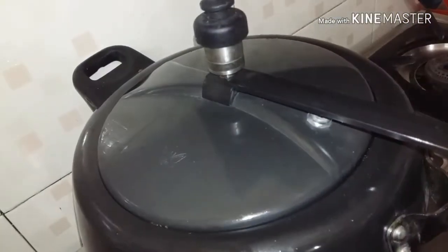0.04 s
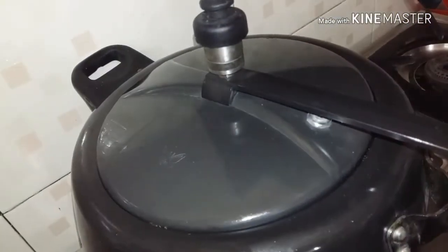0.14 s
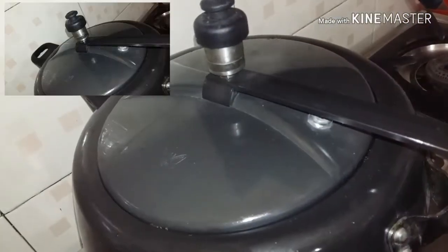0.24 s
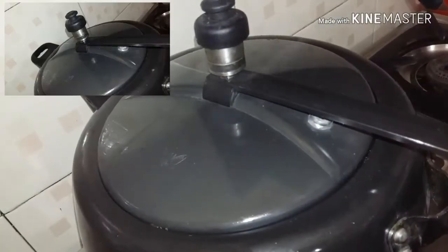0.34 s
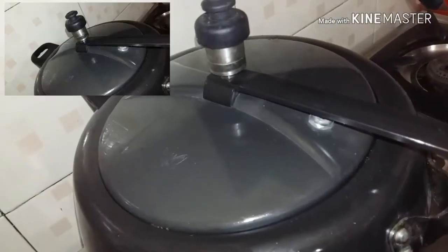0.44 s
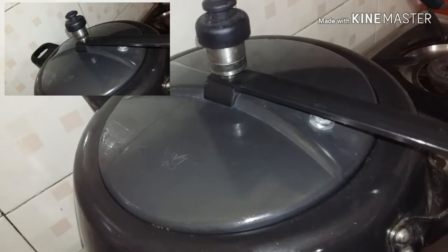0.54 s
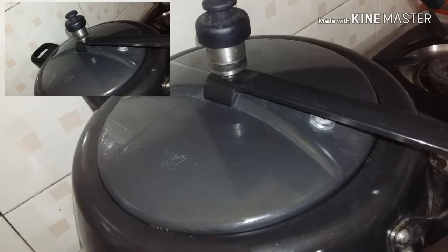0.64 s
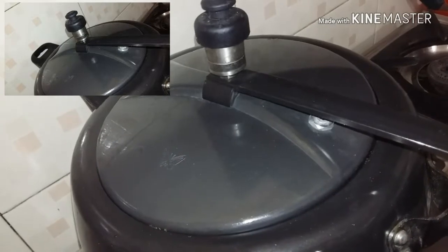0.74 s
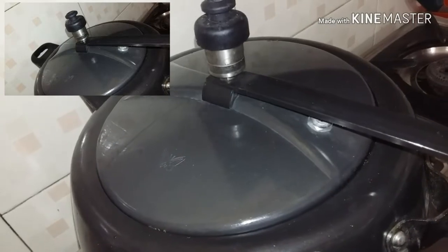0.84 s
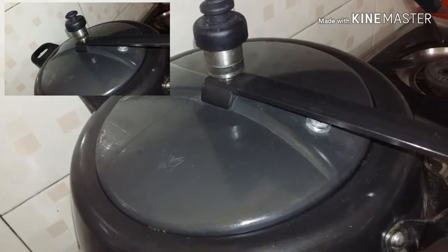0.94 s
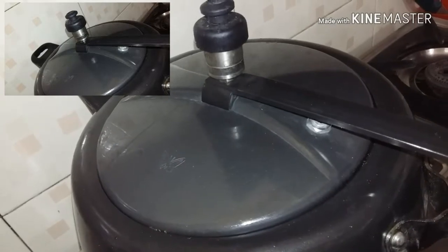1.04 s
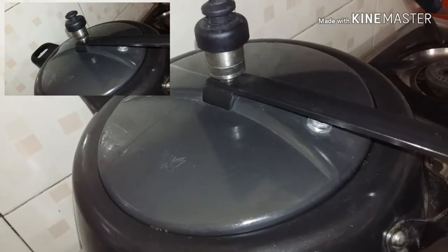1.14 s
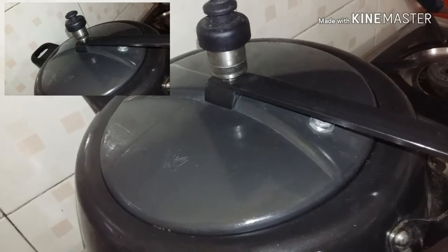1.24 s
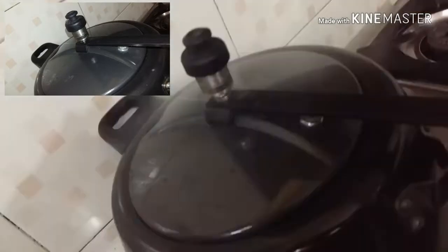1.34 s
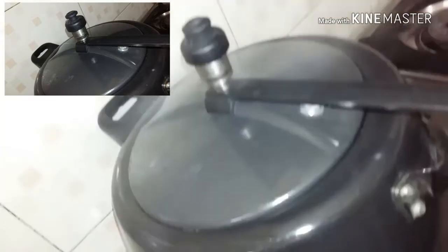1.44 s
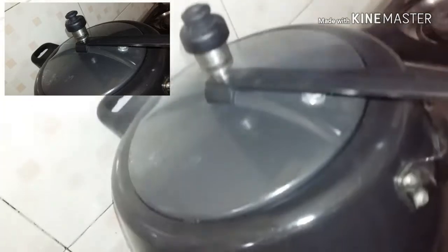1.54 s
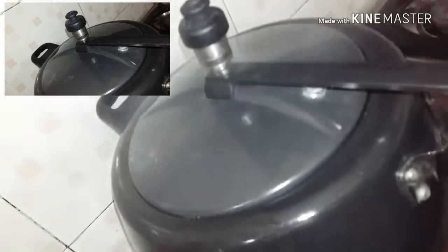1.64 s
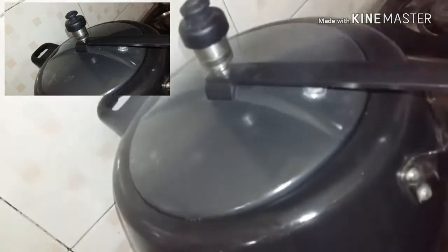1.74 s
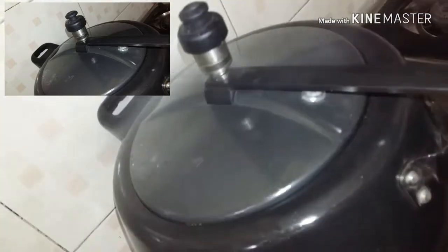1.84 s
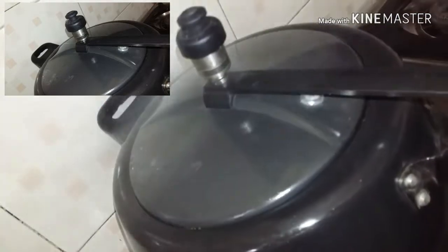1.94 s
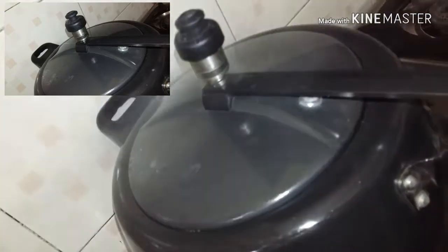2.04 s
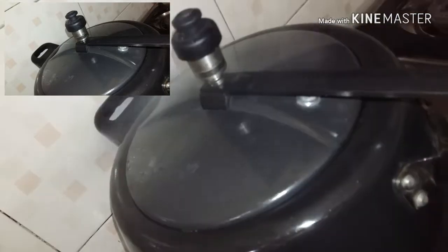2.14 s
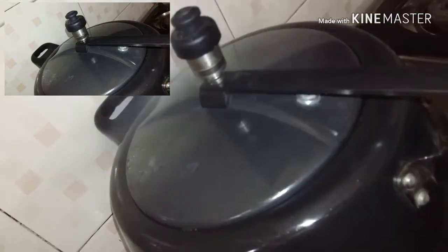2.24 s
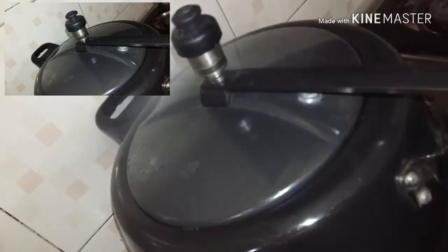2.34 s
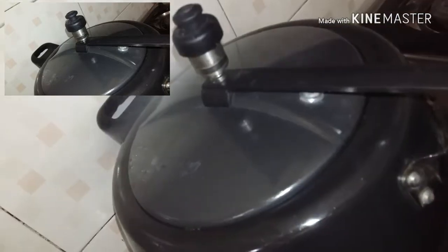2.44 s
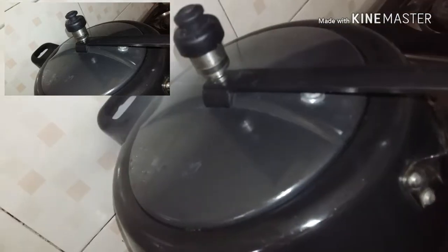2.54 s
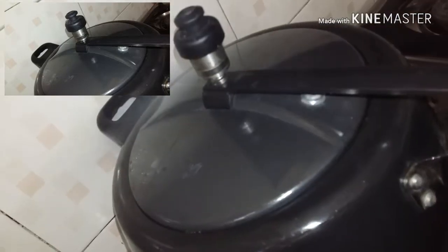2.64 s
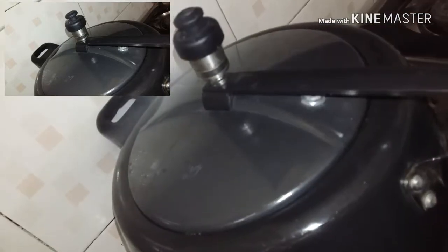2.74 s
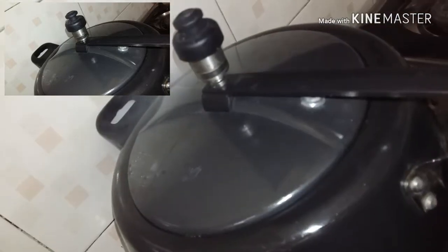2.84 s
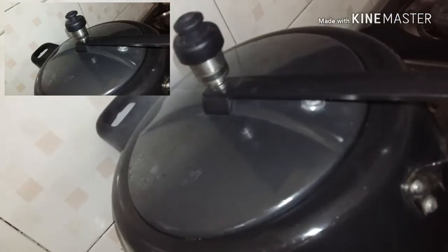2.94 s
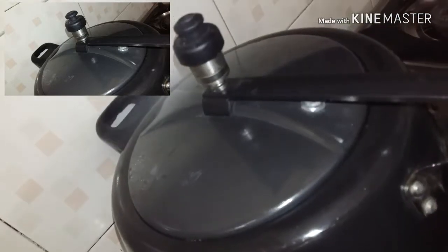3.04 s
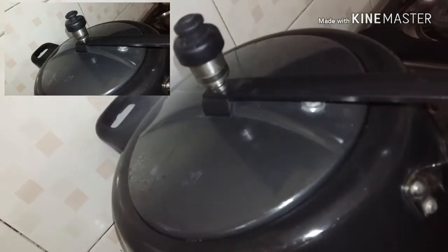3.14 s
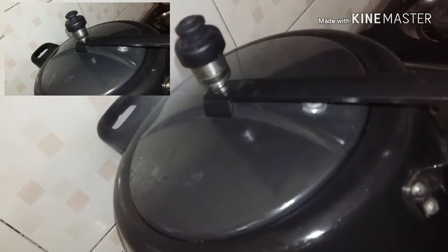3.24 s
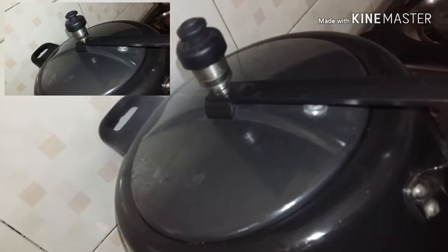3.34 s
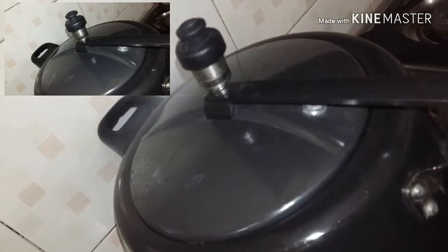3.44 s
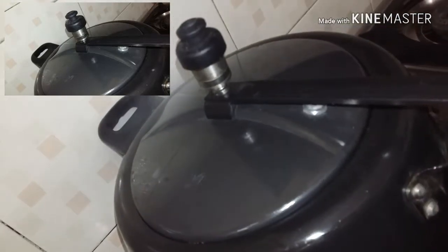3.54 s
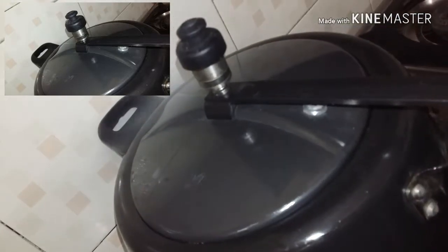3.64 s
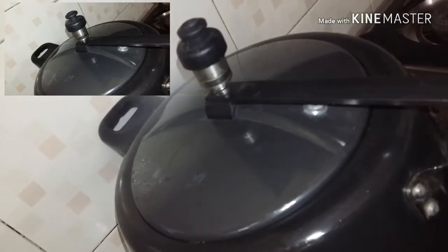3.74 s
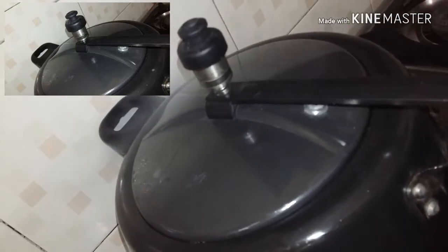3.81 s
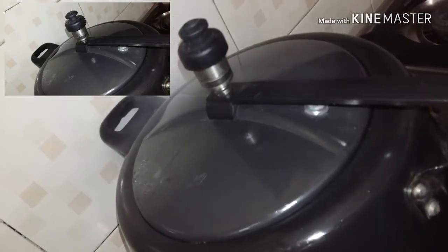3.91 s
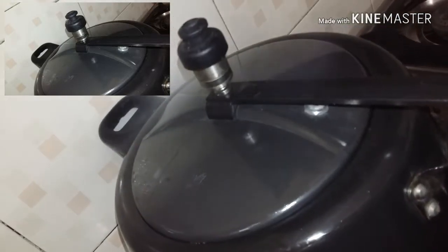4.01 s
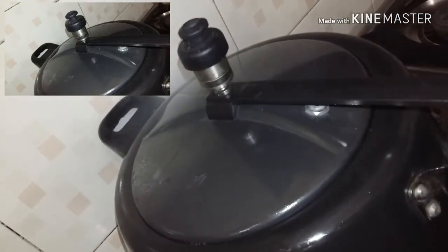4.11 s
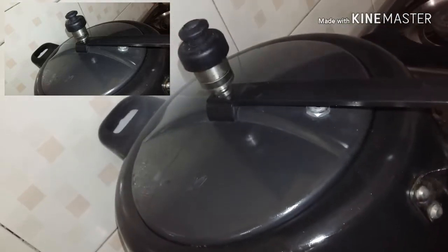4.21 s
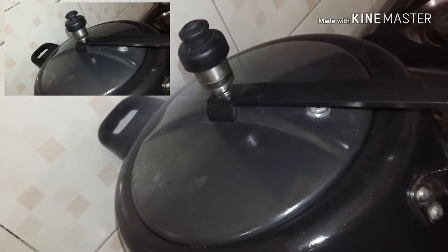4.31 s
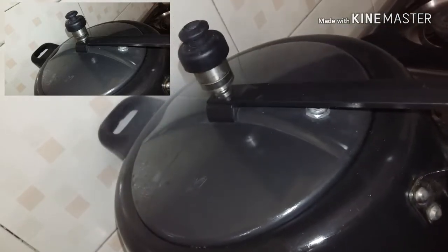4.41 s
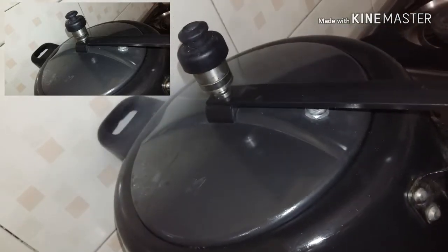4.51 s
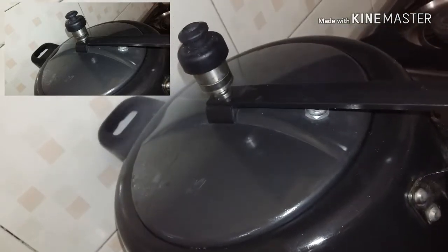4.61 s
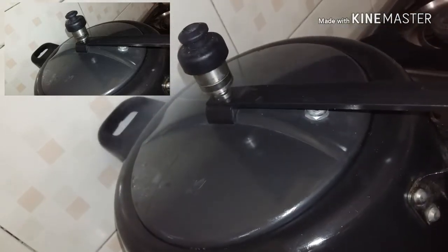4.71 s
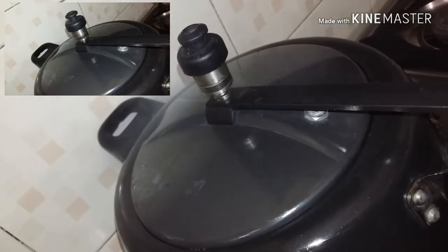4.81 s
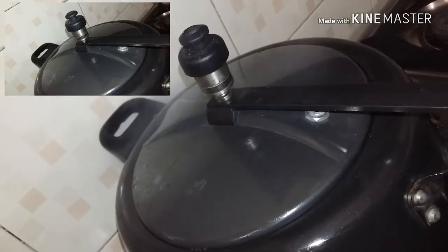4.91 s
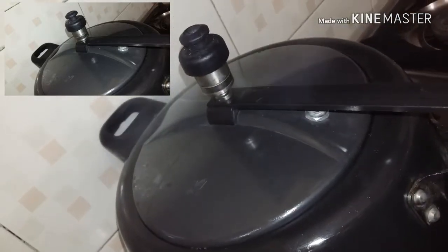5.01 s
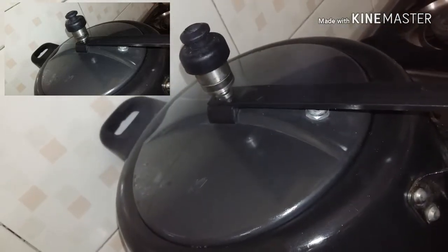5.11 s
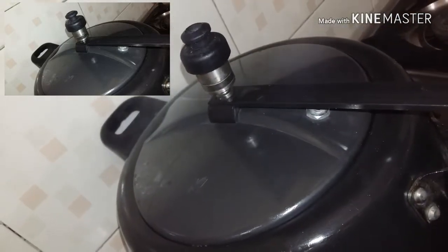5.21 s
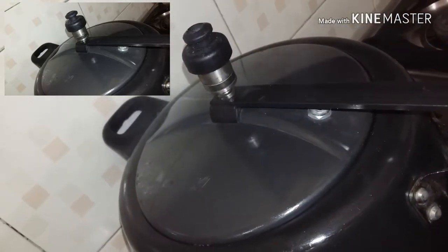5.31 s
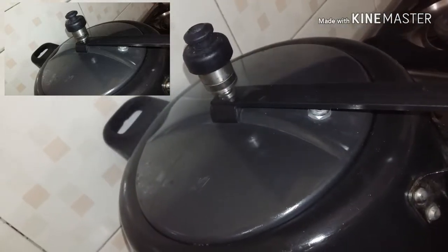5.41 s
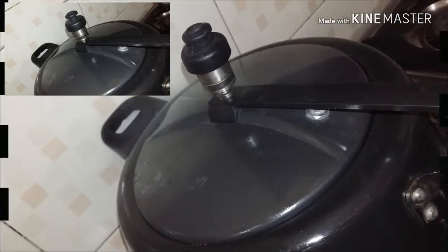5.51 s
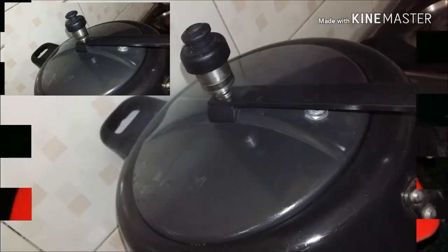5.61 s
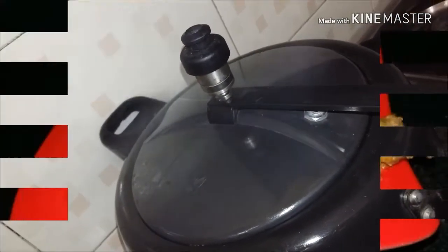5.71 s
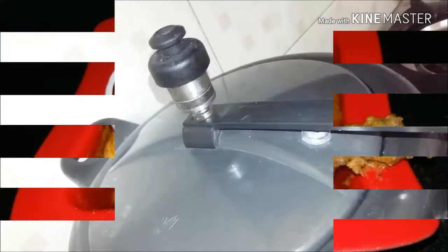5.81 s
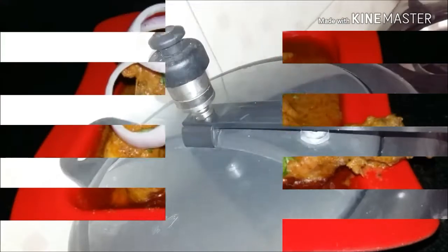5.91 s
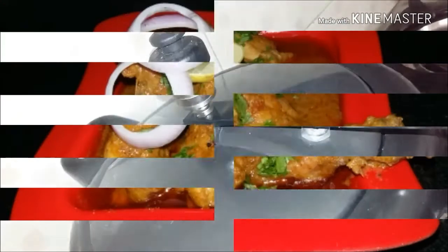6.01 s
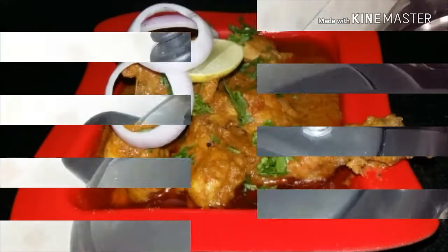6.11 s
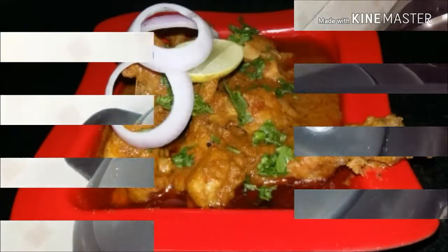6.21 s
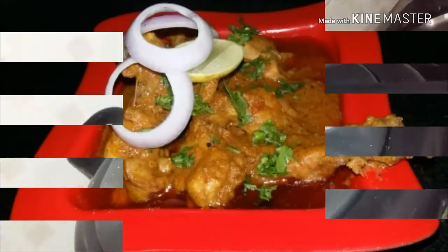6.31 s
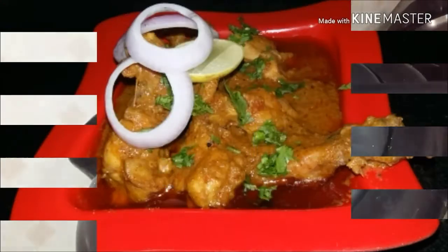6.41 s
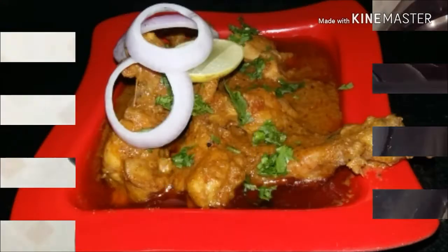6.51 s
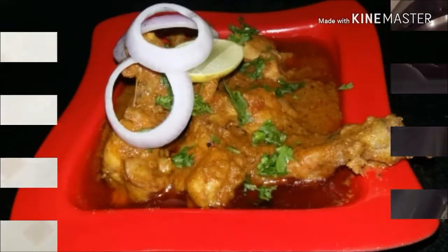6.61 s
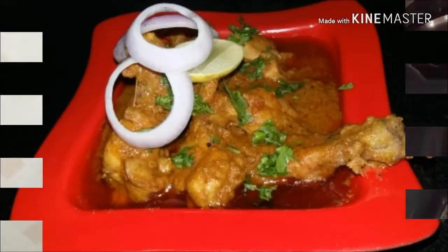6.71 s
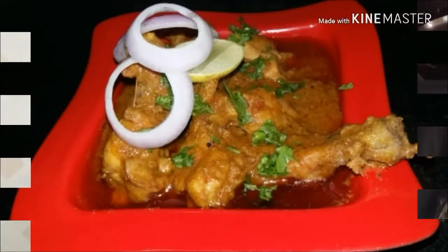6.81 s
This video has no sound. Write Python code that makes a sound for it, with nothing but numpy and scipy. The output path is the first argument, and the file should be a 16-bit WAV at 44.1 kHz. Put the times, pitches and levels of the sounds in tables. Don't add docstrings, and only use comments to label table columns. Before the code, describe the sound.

Close stereo pickup of a stovetop pressure cooker: first a quiet hiss over muffled thumps and a sharp tick, then a sudden switch to roaring, sputtering high-pitched steam. The blast holds steady, changes tone, and quickly loses force. A metal weight drops with a clack and brief rattle, choking the steam; the hard kitchen rings out and only a faint hiss remains.

```python
import sys
import numpy as np
from scipy import signal
from scipy.io import wavfile
from scipy.ndimage import uniform_filter1d

SR = 44100
rng = np.random.default_rng(int(sys.argv[2]) if len(sys.argv) > 2 else 0)


def nominal_scale(level):
    x = np.asarray(level, float) / 20
    return 10 ** x


def output_pcm(signal):
    pcm = np.clip(np.atleast_2d(signal).T, -1, 1) * 32767
    wavfile.write(sys.argv[1], SR, np.round(pcm).astype(np.int16))


N = 302526

JET_START_S, SAG_START_S = 1.4435, 5.8636

# pitch in Hz, level in dB per Hz.
SIMMER_COLOUR = [
    [(30, -91.5), (55, -87), (90, -56.5), (150, -65), (300, -73.5), (700, -74), (1500, -74.5), (2500, -69.5), (5000, -80), (9000, -77.5), (11000, -87), (15000, -87)],
    [(30, -92.6), (55, -86.0), (90, -61), (150, -75.5), (300, -79), (700, -77.5), (1500, -77), (2500, -72), (5000, -79.1), (9000, -84), (11000, -87), (15000, -91.0)],
]
# centre in Hz, width in Hz, level in dB.
SIMMER_PEAKS = [
    [(1110, 310, -2.1), (1350, 130, 3.3), (2490, 80, -2.9), (3050, 140, -5.0), (3190, 120, 3.5), (4710, 350, 2.9), (5000, 350, -4.2), (5530, 60, -2.9), (6000, 270, -4.7), (6020, 90, 7.2), (6920, 140, 5.9), (7050, 1200, -6.2), (7520, 60, 2.6), (8660, 200, 4.5), (8860, 320, -4.2), (9660, 760, 3.8), (10040, 100, -3.1), (10430, 110, 3.4), (10700, 60, -2.7), (10970, 120, 2.3)],
    [(1420, 80, 2.4), (1780, 60, 3.8), (1990, 100, -3.3), (2170, 110, 3.9), (2340, 360, -4.7), (2860, 980, 2.0), (3280, 60, -2.8), (3650, 570, -4.6), (4190, 580, 6.4), (4690, 200, 6.3), (5210, 330, -3.0), (6060, 60, 2.6), (6390, 90, 2.5), (7130, 850, -3.7), (7970, 290, -2.7), (8440, 70, -1.9), (8940, 140, -4.1), (9650, 140, 1.9), (10140, 650, 4.1), (10440, 160, 4.0)],
]
# pitch in Hz, level in dB per Hz.
JET_COLOUR = [
    [(30, -99.0), (55, -98), (90, -90.5), (150, -86), (300, -87), (700, -74), (1500, -63.5), (2500, -55.5), (5000, -59.5), (9000, -57), (11000, -64.5), (15000, -71)],
    [(30, -99.0), (55, -100), (90, -92), (150, -86), (300, -87.5), (700, -75.0), (1500, -64), (2500, -61.5), (5000, -55), (9000, -60.5), (11000, -60.0), (15000, -71)],
]
# centre in Hz, width in Hz, level in dB.
JET_PEAKS = [
    [(480, 40, 3.5), (1320, 180, 1.9), (1550, 40, -2.7), (1700, 160, 2.7), (1920, 150, 3.1), (2120, 200, 5.5), (2540, 180, 3.1), (2920, 60, -2.1), (3310, 250, 6.4), (3450, 180, -4.3), (3730, 140, 3.3), (4210, 80, -2.2), (4370, 150, 3.5), (4650, 70, -1.8), (5150, 340, 4.3), (5190, 100, -6.7), (5450, 110, 3.4), (5680, 50, 3.7), (5960, 100, 7.6), (6190, 100, 5.0), (6580, 150, 5.2), (6910, 300, 4.0), (7100, 100, 3.1), (8180, 790, 7.2), (8990, 80, 1.7), (10290, 90, -1.6), (10520, 80, -3.1), (10750, 120, -2.4)],
    [(910, 260, -2.8), (1300, 230, -4.4), (1630, 110, 2.7), (1750, 60, -1.9), (1940, 1160, 4.1), (2440, 140, -2.7), (2530, 180, 3.4), (2980, 80, 2.0), (3090, 1200, -3.8), (3330, 40, 2.5), (4100, 100, 1.8), (4450, 460, 9.6), (4780, 110, -4.1), (5200, 130, -4.1), (5430, 1200, 3.0), (5600, 120, -5.3), (5770, 140, -4.5), (6200, 400, -2.4), (6590, 210, 4.4), (7020, 40, -2.8), (7240, 750, -3.5), (7590, 210, 4.0), (7900, 130, 1.7), (8280, 60, -1.4), (9010, 300, 3.2), (9410, 70, 2.7), (9900, 1200, -2.6), (10410, 100, 2.2)],
]
# pitch in Hz, level in dB per Hz.
SAG_COLOUR = [
    [(30, -97.8), (55, -94.4), (90, -97), (150, -94), (300, -85.5), (700, -76), (1500, -66.5), (2500, -56.8), (5000, -62), (9000, -67.0), (11000, -68.5), (15000, -77.0)],
    [(30, -97.8), (55, -94.4), (90, -96.0), (150, -95.0), (300, -89), (700, -78.5), (1500, -69.5), (2500, -65), (5000, -55), (9000, -64), (11000, -69.5), (15000, -79)],
]
# centre in Hz, width in Hz, level in dB.
SAG_PEAKS = [
    [(1360, 240, 3.0), (1880, 230, 4.1), (2470, 350, 4.4), (2710, 1120, -4.2), (3460, 110, 3.2), (3760, 190, 2.2), (4230, 290, -4.0), (4740, 170, 3.0), (5580, 120, 3.1), (6000, 80, -2.2), (6150, 690, 10.0), (7100, 770, 9.5), (7170, 120, -5.9), (7550, 150, 3.1), (8110, 490, 3.9), (9460, 270, -2.0), (9650, 80, -3.3), (10810, 120, 2.9)],
    [(1310, 650, -3.5), (1690, 800, 5.9), (2110, 180, -3.5), (2740, 180, -6.2), (3630, 940, -5.8), (3880, 100, 4.6), (4160, 110, -7.3), (4370, 940, 9.3), (5010, 290, -7.4), (5740, 310, -5.9), (6260, 90, -3.2), (6860, 650, 2.6), (7300, 570, -5.5), (7610, 130, 3.8), (8430, 390, -5.3), (9550, 400, -4.7), (10460, 80, 1.7), (10790, 100, 3.2)],
]
# pitch in Hz, level in dB per Hz.
LEAK_COLOUR = [(18, -54), (30, -24), (185, -13.5), (662, -9), (774, -5), (905, -8), (3590, -12),
               (4420, -8.5), (9640, -18.5), (12200, -25), (15000, -24)]
# centre in Hz, width in Hz, level in dB.
LEAK_PEAKS = [(772, 40, 5), (190, 36, 9), (1060, 55, 6), (1270, 55, 7), (1820, 50, 6), (3700, 300, -2),
              (4410, 320, 1), (5000, 300, -8), (13000, 5000, -1)]
# pitch in Hz, share in step (0 to 1, minus is flipped), share a quarter turn ahead.
SIMMER_PORTS = [(60, 0.99, 0), (260, 1.01, -0.01), (780, 0.92, 0.1), (1550, 0.37, -0.13),
                (1810, -0.26, -0.3), (2240, 0.63, -0.36), (2500, 0.8, 0.18), (2930, 0.7, 0.19),
                (3190, 0.5, -0.6), (4130, 0.26, 0.68), (4310, 0.59, 0.38), (4820, 0.42, 0.6),
                (5080, 0.04, -0.08), (5250, -0.02, 0.39), (5430, -0.44, 0.14), (5940, 0.21, 0.25),
                (6200, -0.2, 0.02), (6800, 0.47, -0.1), (7580, -0.18, 0.44), (8870, -0.42, 0.43),
                (9560, -0.59, -0.22), (10770, -0.43, -0.05), (10940, 0.54, 0.05), (11020, -0.15, 0.07),
                (11540, 0.25, 0.15)]
JET_PORTS = [(60, 0.99, 0), (260, 1.03, 0.01), (1120, 0.8, -0.15), (1460, 0.48, 0.04), (1640, -0.19, -0.45),
             (2240, 0.49, -0.2), (2330, 0.3, -0.24), (2500, 0.53, 0.13), (2840, -0.18, -0.02),
             (3190, 0.19, 0.31), (3360, -0.42, 0.43), (3530, 0.01, 0.41), (3880, -0.4, 0.27),
             (4130, -0.01, -0.07), (4310, -0.63, 0.27), (4390, -0.64, 0.15), (4820, 0.32, 0.18),
             (5080, 0.33, -0.33), (5510, 0.59, 0.21), (5860, 0.29, 0.02), (6030, 0.56, 0.28),
             (6200, 0.4, -0.47), (6460, 0.31, -0.35), (6630, 0.81, 0.17), (6890, 0.64, 0.2),
             (7060, -0.18, -0.13), (7580, -0.28, -0.04), (7920, -0.57, 0.33), (8180, -0.63, 0.15),
             (8440, -0.24, -0.06), (9300, -0.5, -0.42), (9470, -0.62, -0.18), (9820, -0.13, 0.02),
             (10420, 0.07, -0.39), (10770, -0.15, -0.03), (11460, 0.49, 0.07), (11540, 0.34, 0.06)]
SAG_PORTS = [(60, 0.99, 0), (260, 1.03, -0.03), (1460, 0.58, -0.23), (1810, -0.14, -0.64), (2500, 0.6, 0.2),
             (2840, -0.06, -0.12), (3010, 0.44, 0.48), (3450, 0.19, 0.61), (3620, -0.59, 0.37),
             (4130, -0.3, 0.16), (4740, 0.78, 0.32), (5340, -0.16, 0.05), (5510, 0.46, 0.26),
             (5770, -0.1, 0.26), (5860, 0.4, 0.08), (6460, 0.7, -0.29), (6890, 0.78, 0.17),
             (7320, -0.36, -0.08), (7580, 0.08, -0.43), (8100, 0.06, 0.52), (8790, -0.4, 0.1),
             (9820, 0.23, 0.32), (10510, -0.18, -0.34), (11370, -0.02, -0.12), (11540, 0.48, -0.13)]
# time in seconds, peak in dB, pitch in Hz.
THUMPS = [(0.009, -27, 88), (0.109, -28, 90), (0.149, -31, 96.9), (0.291, -31, 96), (0.389, -35, 99.6),
          (0.463, -35, 102), (0.659, -33, 108), (0.787, -28, 110), (0.843, -35, 86.1), (0.9, -33, 93),
          (0.986, -25.5, 97), (1.058, -33, 92), (1.152, -30, 109), (1.239, -31, 95), (1.31, -24.5, 94)]
# start in seconds, peak in dB.
TICKS = [
    (0.0855, -14),
    (0.4808, -33),
    (0.8535, -33),
]
# pitch in Hz, level in dB, seconds to fade by 60 dB.
TICK_MODES = [(1320, -5, .012), (2500, 6, 0.0074), (3540, -4, .012), (4600, -1, .014), (5720, -4, .01),
              (6660, 1.5, 0.01)]
# start in seconds, peak in dB.
CLACK = [
    (6.369, -16.5),
]
# pitch in Hz, level in dB, seconds to fade by 60 dB.
LID_MODES = [(190, -23, .3), (1071, -13, 0.22), (1540, -16, .2), (765, -10, 0.12), (1064, -11, .06),
             (1290, -11, 0.045), (2245, -7, 0.11), (2630, 8, 0.026), (2610, -14, 0.33), (2680, -16, 0.4),
             (785, -12, 0.4), (2300, -10, .11), (4050, -7, .1), (5800, -16, .1)]
# pitch in Hz, level in dB per Hz.
RATTLE_COLOUR = [(60, -34), (250, -24), (500, -13.5), (780, 1), (1000, -10), (1400, -6), (2000, -9),
                 (2650, -7), (3200, -14), (9000, -23.5)]
# pitch in Hz, seconds to fade by 60 dB.
RATTLE_FADE = [(200, 0.35), (800, 0.23), (1400, 0.19), (2700, 0.27), (8000, 0.19)]
# centre in Hz, width in Hz, level in dB.
KITCHEN = [(2135, 60, 2), (2340, 50, -2.5), (2530, 25, 3), (3550, 30, 2), (4430, 30, 2), (4720, 27, 2),
           (4875, 35, 2), (5690, 30, 3), (5968, 35, 2), (6601, 27, 3.5), (8297, 50, 2), (8448, 45, 2.5)]
# start in seconds, length in seconds, pitch in Hz, level in dB.
HUMS = [(0.00078, 0.16, 800, -47), (.3, 0.19, 780, -50), (0.0011, 0.73, 740, -53.5),
        (0.001, 0.13, 440, -50), (0.33, 0.27, 465, -53.5), (.85, 0.42, 485, -53), (.5, .3, 590, -61),
        (.58, .22, 470, -54), (1.7, 0.17, 920, -57), (.86, .12, 580, -54), (1, 0.23, 300, -46),
        (1.25, 0.25, 850, -50.5), (1.1, 0.38, 580, -53), (6.42, 0.45, 860, -67), (6.44, .26, 170, -72),
        (6.385, .12, 361, -61), (6.5, .2, 1400, -76), (6.5, 0.38, 1400, -73)]
# centre in Hz, width in Hz, level in dB.
FLAME = [(75, 19, 1), (95, 20, 4), (304, 60, 5), (460, 38, 5.5), (596, 30, 6.5), (780, 35, 5.5),
         (860, 28, 4)]
# centre in Hz, width in Hz, level in
# dB.
TOP_LIFT = [(14500, 1600, 7.5)]
# time in seconds, level in dB.
JET_PRESSURE = [(1.44, -19), (2.67, -19), (3.3, -18.5), (5.45, -18), (5.86, -20)]
# centre in Hz, half width in Hz, share of time emptied.
HOLES = [
    (12300, 1000, .97),
    (12700, 720, .92),
    (13700, 500, .55),
]

SIMMER_DB, SIMMER_DB_PER_S = -38, -0.5
THUMP_S = 0.06
ECHO_SHARE = 0.25
BITE_DB, BITE_DB_PER_S = 1.4, -0.32
SHADE_HZ, SHADE_DB, SHADE_S = (3900, 5270), -3, 0.47
SAG_DB, SAG_DB_PER_S = -20, -11.5
CHOKE_S, CHOKE_DB_PER_S, CHOKE_DEPTH_DB, AFTER_DB_PER_S = 6.344, -273, -18.5, -115
LEAK_S, LEAK_DB, LEAK_DB_PER_S = 6.5, -55, -16
POP_DB = -18
RATTLE_HOLD_S, RATTLE_DB = 0.027, -32
SIDE_SHIFT_HZ, NOTCH_HZ, NOTCH_SHARE = 100, 14125, 0.62
RIM_HZ, RIM_SHARE, TOP_HZ = 15160, 0.88, 15510
BASS_HZ, BASS_SHARE = 200, 0.17
WEAK_DB = -1.2
OFFSET = -0.0003


def evened(x):
    return x / np.sqrt(np.mean(x ** 2) + 1e-20)


def read(points, hz, column=1):
    points = np.array(points)
    return np.interp(np.log(hz + 1), np.log(points[:, 0] + 1), points[:, column])


def level(curve):
    s, db = np.transpose(curve)
    return nominal_scale(np.interp(np.arange(N) / SR, s, db))


def slope(start_s, db_per_s):
    return db_per_s * np.maximum(np.arange(N) / SR - start_s, 0)


def add(mix, s, sound):
    part = mix[..., round(s * SR):][..., :sound.shape[-1]]
    part += sound[..., :part.shape[-1]]


def high_pass(order, hz):
    return signal.butter(order, hz, "high", fs=SR, output="sos")


def colour_db(spectrum, peaks, hz):
    bumps = sum(db / (1 + (2 * (hz - f) / width) ** 2) for f, width, db in peaks)
    return read(spectrum, hz) + bumps


def hiss(spectra, peaks, ports, patchy_db, flicker_db, ripple_db):
    frames, hz = N // 512 + 5, np.fft.rfftfreq(2048, 1 / SR)
    a, b, c, d, patches = rng.standard_normal((frames, 1025, 5)).T
    patches = uniform_filter1d(patches, size=24, axis=0)
    patches = evened(uniform_filter1d(patches, size=6, axis=1))
    flicker = evened(uniform_filter1d(rng.standard_normal(frames), size=4))
    room = np.minimum(hz / 1500, 1)
    ripple = rng.standard_normal((2, 1025)) * room

    follows = (read(ports, hz) + 1j * read(ports, hz, column=2))[:, None]
    echoes = rng.standard_normal((1025, 1)) + 1j * rng.standard_normal((1025, 1))
    follows = follows + ECHO_SHARE * echoes * room[:, None]
    follows = follows / np.maximum(abs(follows), 1)
    left = a + 1j * b
    own = np.sqrt(abs(1 - abs(follows) ** 2)) * (c + 1j * d)
    z = np.array([left, follows * left + own])

    colours = np.array([colour_db(s, p, hz) for s, p in zip(spectra, peaks)]) + ripple_db * ripple
    z *= nominal_scale(colours[:, :, None] - colours.max() + patchy_db * patches + flicker_db * flicker)
    return evened(signal.istft(z, nperseg=2048, noverlap=1536)[1][:, :N])


def spatter(per_s, spread_db):
    size = nominal_scale(spread_db * np.minimum(rng.exponential(1, N), 4))
    size = size * (rng.random(N) < per_s / SR)
    return evened(1 + 0.079 * signal.oaconvolve(size, np.hanning(70), "same"))


def ring(modes, seconds, rise_s):
    t = np.arange(round(seconds * SR)) / SR
    sound = 0
    for hz, db, t60 in modes:
        sound = sound + nominal_scale(db - 60 * t / t60) * np.sin(2 * np.pi * (hz * t + rng.random()))
    sound = sound * np.minimum(t / rise_s, 1)
    return sound / abs(sound).max()


def leak_and_flame():
    peaks = [p + FLAME for p in SIMMER_PEAKS]
    noise = hiss(SIMMER_COLOUR, peaks, SIMMER_PORTS, patchy_db=1.1, flicker_db=0.6, ripple_db=2.2)
    return nominal_scale(SIMMER_DB + slope(0, SIMMER_DB_PER_S) + 3.0) * noise


def bubble_thumps():
    mix = np.zeros(N)
    t = np.arange(round(THUMP_S * SR)) / SR
    for s, db, hz in THUMPS:
        tone = np.sin(2 * np.pi * (hz * t + rng.random()))
        add(mix, max(s - 0.21 * THUMP_S, 0), nominal_scale(db - 5.0) * np.hanning(len(t)) * tone)
    return mix


def weight_ticks():
    mix = np.zeros(N)
    for s, db in TICKS:
        add(mix, s, nominal_scale(db) * ring(TICK_MODES, seconds=0.03, rise_s=0.0012))
    return mix


def simmer():
    mix = leak_and_flame() + bubble_thumps() + weight_ticks()
    mix = signal.sosfilt(high_pass(10, 63), mix)
    return mix * (np.arange(N) < JET_START_S * SR)


def pot_hums():
    mix = np.zeros(N)
    for start, length, hz, db in HUMS:
        t = np.arange(round(length * SR)) / SR
        drift = uniform_filter1d(rng.standard_normal((2, SR)), size=1400)[:, :len(t)]
        tone = np.cos(2 * np.pi * hz * t) * (drift[0] + 0.032) + np.sin(2 * np.pi * hz * t) * drift[1]
        add(mix, start, nominal_scale(db) * evened(tone) * signal.windows.tukey(len(t), 0.5))
    return mix


def full_jet():
    t = np.arange(N) / SR
    peaks = [p + KITCHEN + TOP_LIFT for p in JET_PEAKS]
    steam = hiss(JET_COLOUR, peaks, JET_PORTS, patchy_db=1.15, flicker_db=0.2, ripple_db=0.98)
    edge = signal.sosfiltfilt(high_pass(2, 7000), steam)
    steam += (nominal_scale(BITE_DB + slope(JET_START_S, BITE_DB_PER_S)) - 1) * edge
    shade_band = signal.butter(2, SHADE_HZ, "band", fs=SR, output="sos")
    shaded = signal.sosfiltfilt(shade_band, steam[1])
    steam[1] += (nominal_scale(SHADE_DB * np.exp(-abs(t - JET_START_S) / SHADE_S)) - 1) * shaded
    steam *= spatter(per_s=150, spread_db=2.6)
    return nominal_scale(3.0) * level(JET_PRESSURE) * steam * (t >= JET_START_S) * (t < SAG_START_S)


def change_pop():
    mix = np.zeros(N)
    add(mix, SAG_START_S - 8 / SR, -nominal_scale(POP_DB + 2.0) * np.hanning(16))
    return mix


def weakening_jet():
    t = np.arange(N) / SR
    peaks = [p + TOP_LIFT + [(390, 60, -5)] for p in SAG_PEAKS]
    steam = hiss(SAG_COLOUR, peaks, SAG_PORTS, patchy_db=0.9, flicker_db=-0.2, ripple_db=2.7)
    steam = steam * spatter(per_s=80, spread_db=5.0)
    choked_s = CHOKE_S + CHOKE_DEPTH_DB / CHOKE_DB_PER_S
    choke_db = np.maximum(slope(CHOKE_S, CHOKE_DB_PER_S), CHOKE_DEPTH_DB)
    choke_db = choke_db + slope(choked_s, AFTER_DB_PER_S)
    flow = nominal_scale(SAG_DB + slope(SAG_START_S, SAG_DB_PER_S) + choke_db)
    still_open = np.clip((6.64 - t) / 0.099, 0, 1)
    return nominal_scale(3.5) * flow * steam * still_open * (t >= SAG_START_S)


def faint_leak():
    steam = hiss([LEAK_COLOUR] * 2, [LEAK_PEAKS] * 2, SAG_PORTS,
                 patchy_db=1.9, flicker_db=1.2, ripple_db=3.0)
    loudness = nominal_scale(1.5 + LEAK_DB + slope(LEAK_S, LEAK_DB_PER_S))
    return loudness * steam * (np.arange(N) >= SAG_START_S * SR)


def clack():
    s, db = CLACK[0]
    half = SR // 2
    noise = rng.standard_normal((2, half)) + 0.97 * rng.standard_normal(half)
    hz, t, z = signal.stft(noise, SR, nperseg=256)
    fade_db = 60 * np.maximum(t - RATTLE_HOLD_S, 0) / read(RATTLE_FADE, hz)[:, None]
    z = z * nominal_scale(read(RATTLE_COLOUR, hz)[:, None] - fade_db)
    rattle = signal.istft(z, SR, nperseg=256)[1][:, :half]
    rise = np.minimum(np.arange(half) / (0.0038 * SR), 1)
    rattle = rattle / rattle[:, :SR // 50].std() * rise
    mix = np.zeros((2, N))
    add(mix, s, nominal_scale(db - 2.5) * ring(LID_MODES, seconds=0.4, rise_s=0.00071))
    add(mix, s, nominal_scale(RATTLE_DB) * rattle)
    return mix


def scene():
    return (simmer() + pot_hums() + full_jet() + change_pop()
            + weakening_jet() + faint_leak() + clack())


def treble_holes(x, weak_db):
    lead_in = 233
    turn = np.array([[1, 1], [1, -1.015]]) / np.sqrt(2)
    window = signal.windows.cosine(2048)
    padded = np.pad(turn @ x, ((0, 0), (lead_in, 0)))
    hz, t, z = signal.stft(padded, SR, window, nperseg=2048)
    edges = np.r_[np.arange(5) * SR / 512, np.arange(1, 23) * SR / 64, TOP_HZ]
    band = np.searchsorted(edges, hz, "right") - 1
    centre = (edges + SR / 128)[:, None]

    middle_hz, half_hz, most = np.array(HOLES)[np.searchsorted([JET_START_S, SAG_START_S], t)].T
    share = np.array([most / (1 + ((centre - middle_hz - shift) / half_hz) ** 4)
                      for shift in (0, SIDE_SHIFT_HZ)])
    notch = NOTCH_SHARE * (abs(centre - NOTCH_HZ) < SR / 256)
    rim = RIM_SHARE * (centre > RIM_HZ + SR / 256)
    share = np.maximum(share, notch + rim)
    under_jet = (t > JET_START_S) * (t < CLACK[0][0]) * (abs(t - SAG_START_S) > 0.03)
    share += (edges >= TOP_HZ)[:, None] + BASS_SHARE * (edges < BASS_HZ)[:, None] * under_jet

    luck = uniform_filter1d(rng.standard_normal((len(t), len(edges))), size=2, axis=0)
    luck = luck.argsort(axis=0).argsort(axis=0).T / len(t)
    empty = (luck + 4 / len(t) < share)[:, band]
    usual = uniform_filter1d(abs(z), size=16, axis=1)
    weak = (abs(z) < nominal_scale(weak_db) * usual) & (hz > 10200)[:, None]
    kept = signal.istft(z * ~(empty | weak), SR, window, nperseg=2048)[1]
    return turn @ kept[:, lead_in:lead_in + N]


def low_pass(x):
    return signal.sosfilt(signal.butter(12, 16610, fs=SR, output="sos"), x)


def record(dry):
    ceiling = 1.3
    rounded = ceiling * np.tanh(dry / ceiling)
    mix = treble_holes(rounded, weak_db=WEAK_DB) + OFFSET
    return low_pass(mix)


dry = scene()
out = record(dry)
output_pcm(out)
```